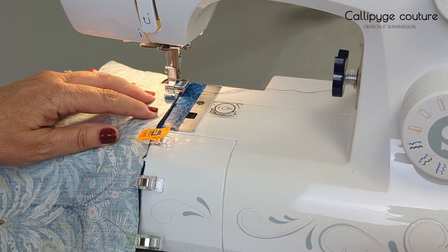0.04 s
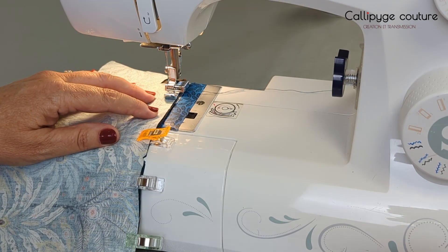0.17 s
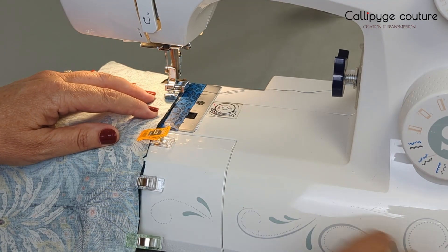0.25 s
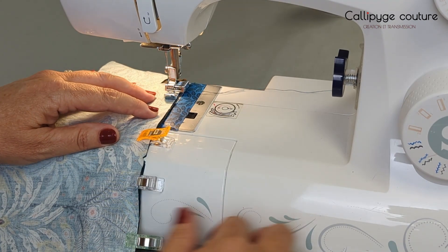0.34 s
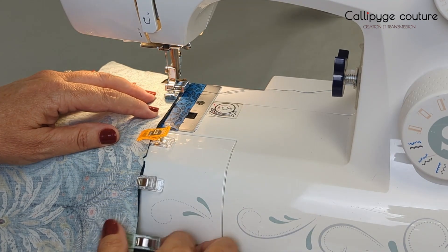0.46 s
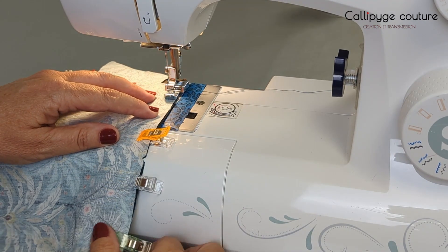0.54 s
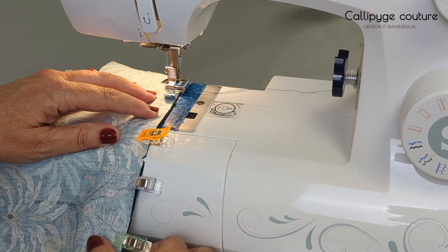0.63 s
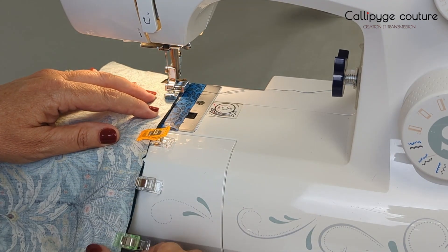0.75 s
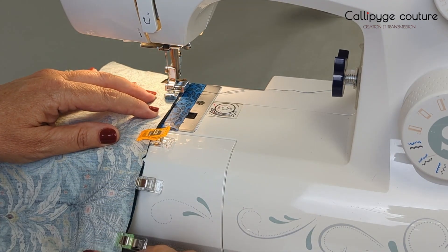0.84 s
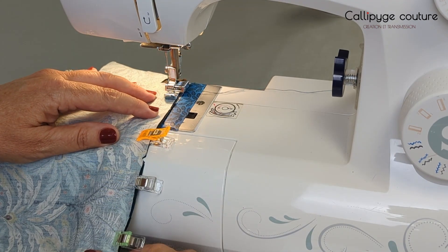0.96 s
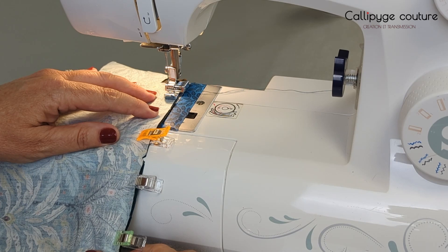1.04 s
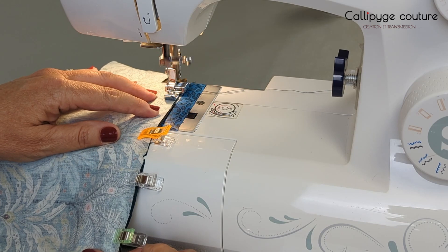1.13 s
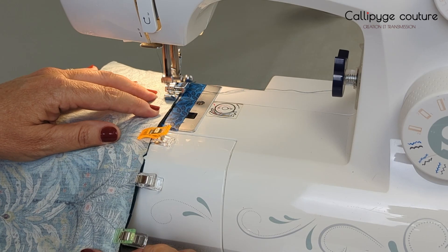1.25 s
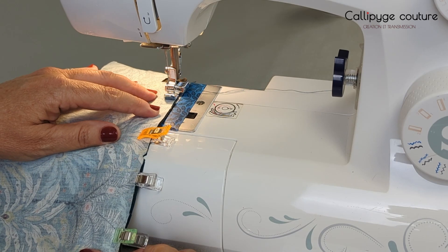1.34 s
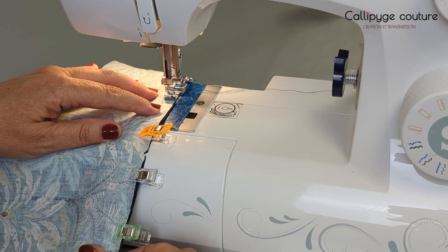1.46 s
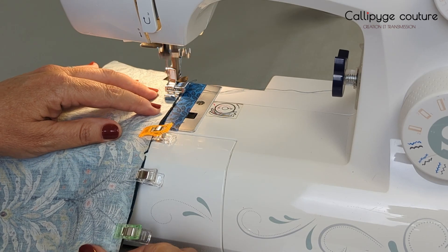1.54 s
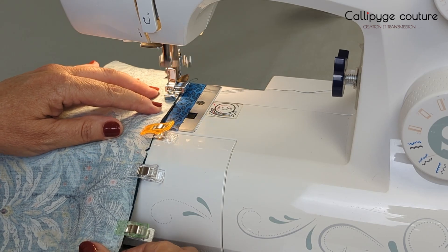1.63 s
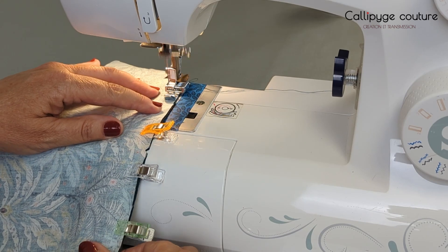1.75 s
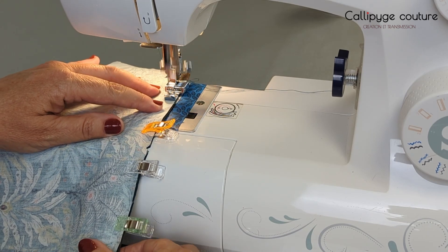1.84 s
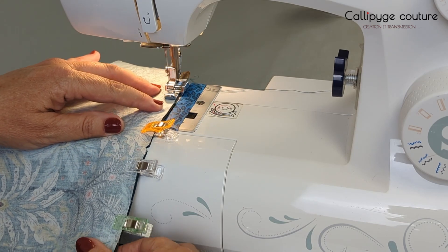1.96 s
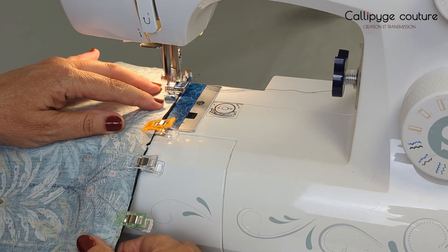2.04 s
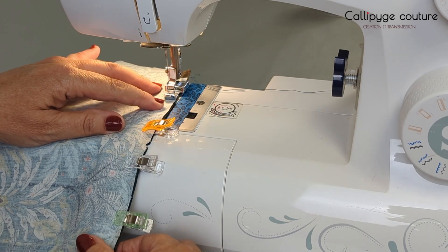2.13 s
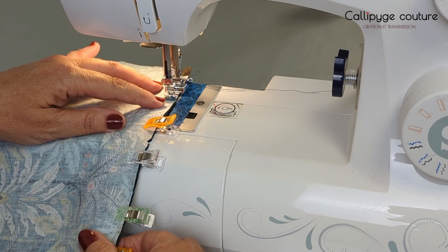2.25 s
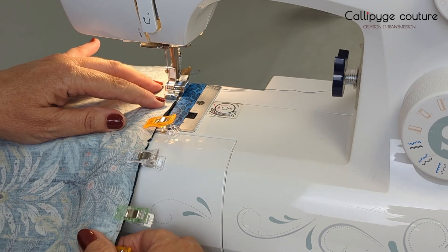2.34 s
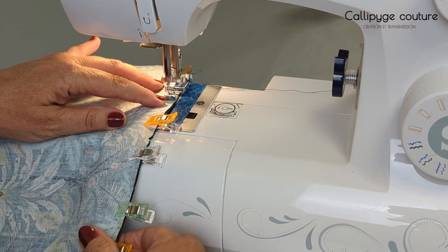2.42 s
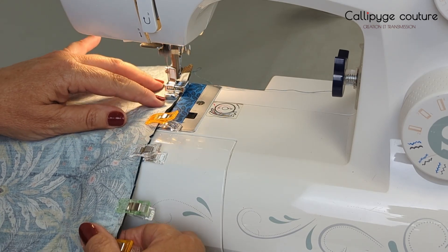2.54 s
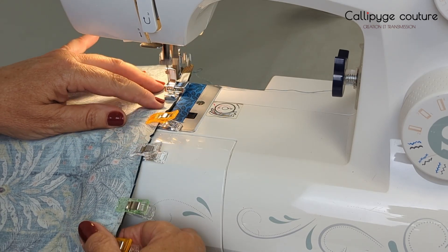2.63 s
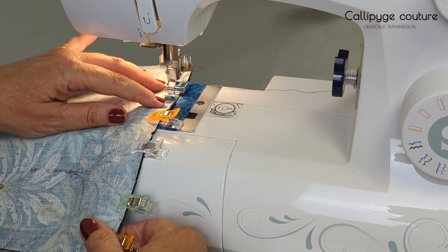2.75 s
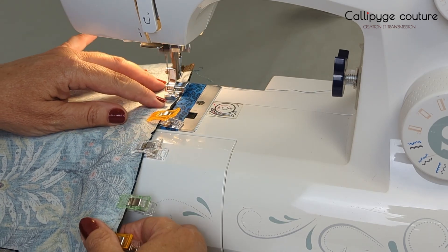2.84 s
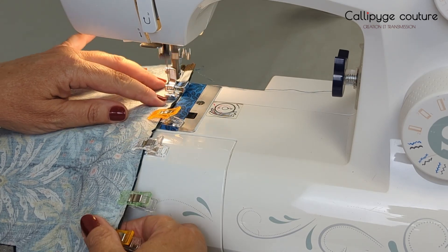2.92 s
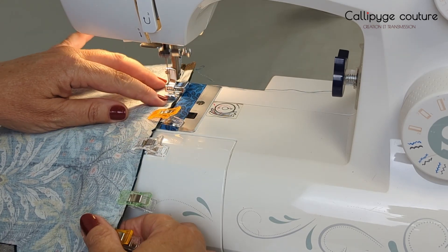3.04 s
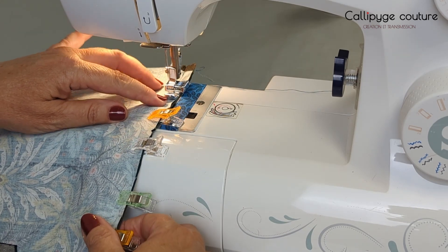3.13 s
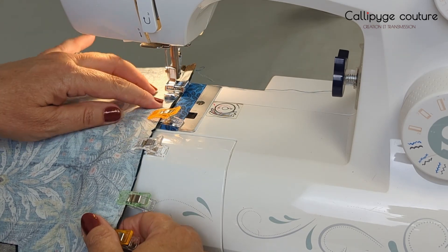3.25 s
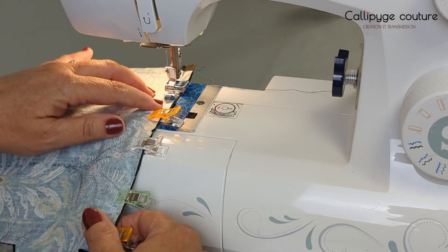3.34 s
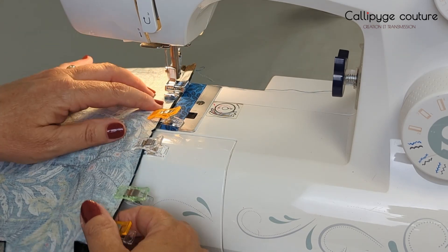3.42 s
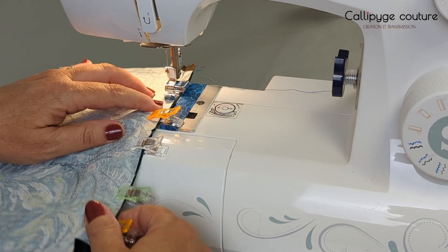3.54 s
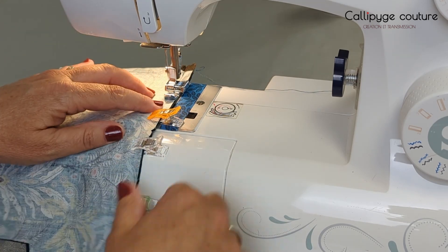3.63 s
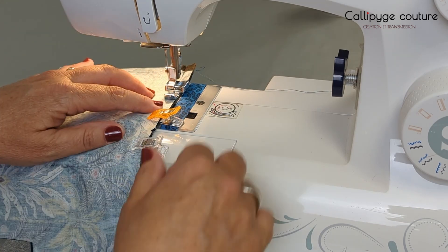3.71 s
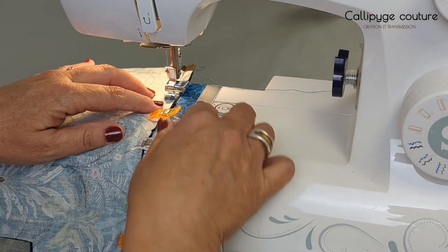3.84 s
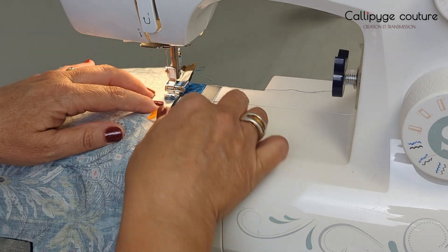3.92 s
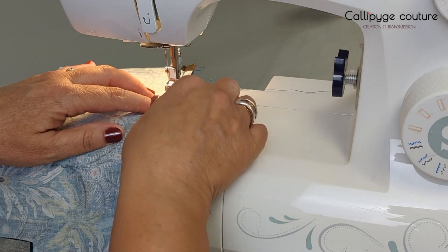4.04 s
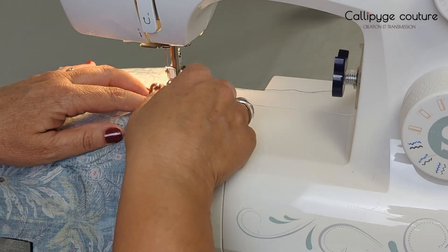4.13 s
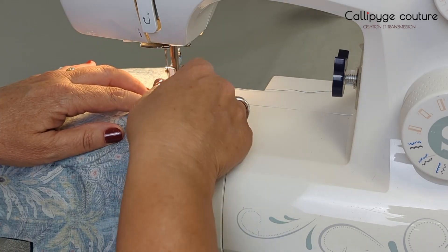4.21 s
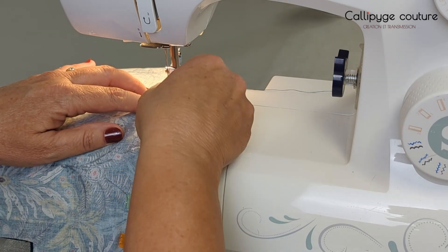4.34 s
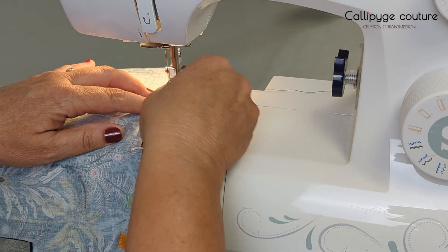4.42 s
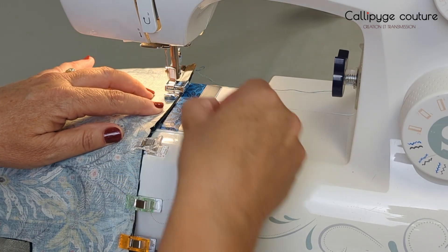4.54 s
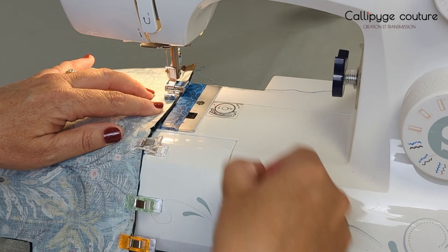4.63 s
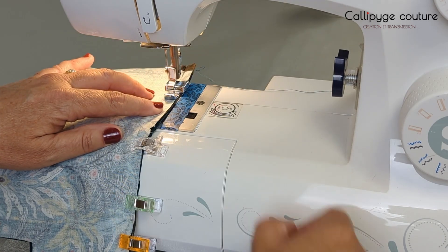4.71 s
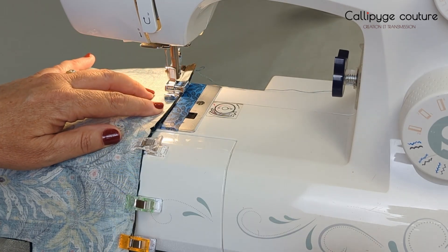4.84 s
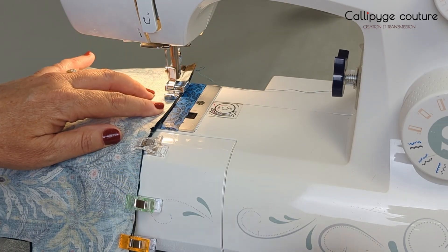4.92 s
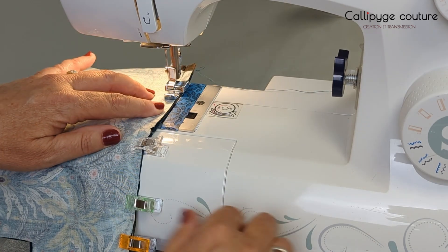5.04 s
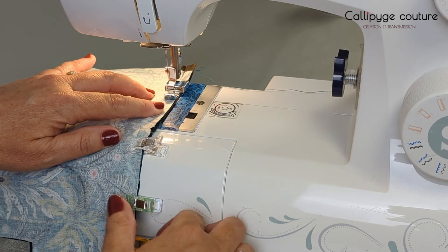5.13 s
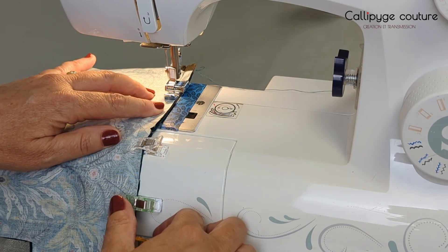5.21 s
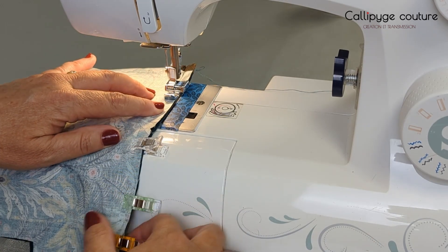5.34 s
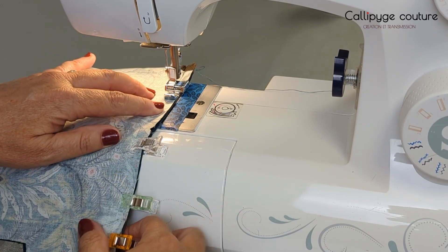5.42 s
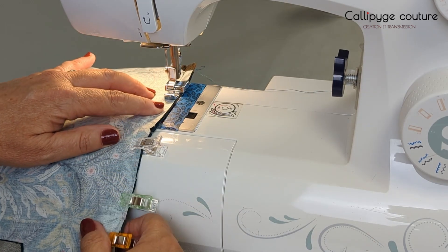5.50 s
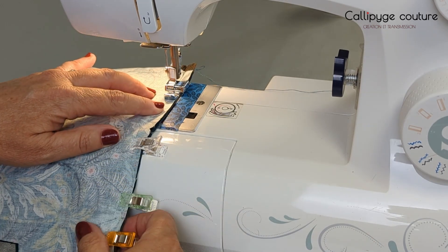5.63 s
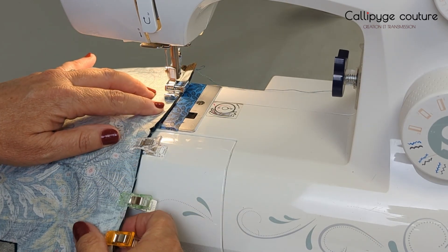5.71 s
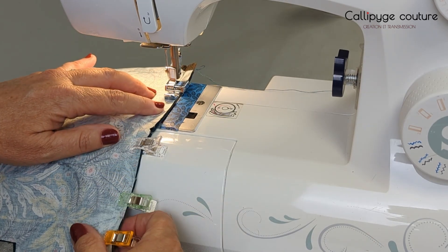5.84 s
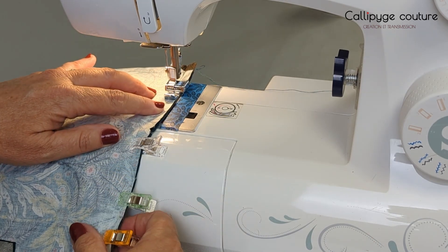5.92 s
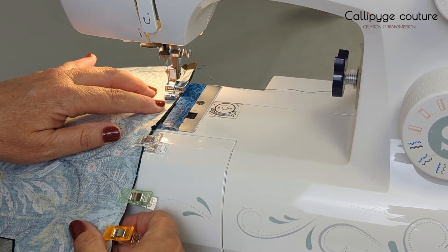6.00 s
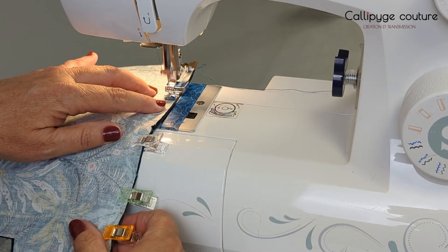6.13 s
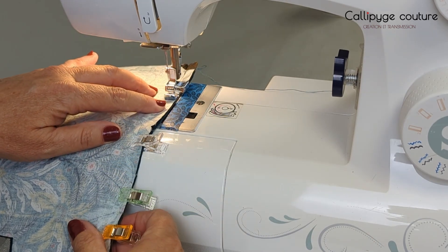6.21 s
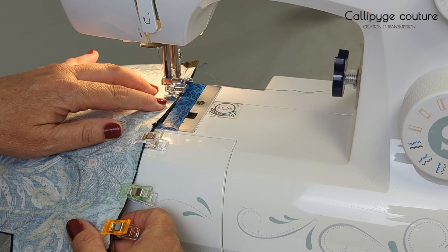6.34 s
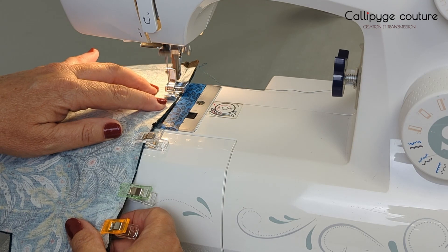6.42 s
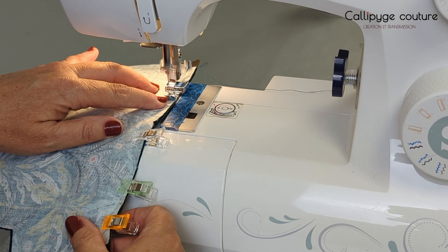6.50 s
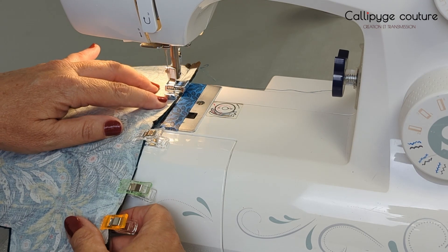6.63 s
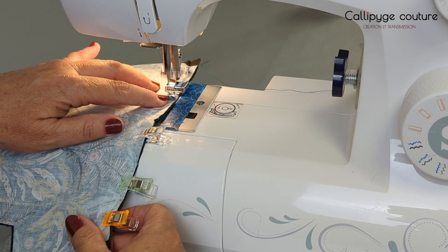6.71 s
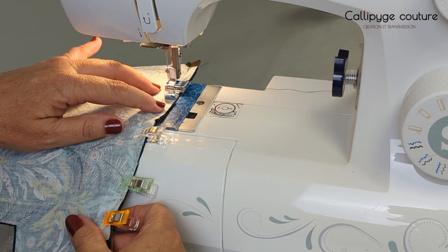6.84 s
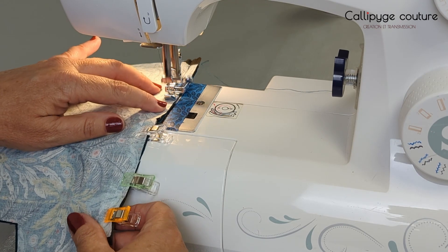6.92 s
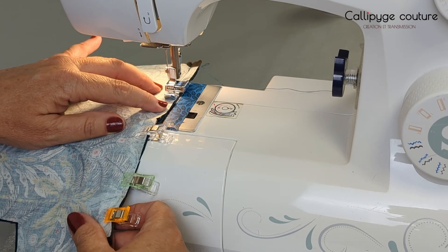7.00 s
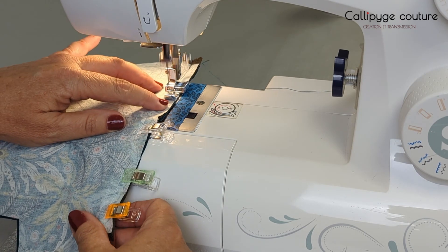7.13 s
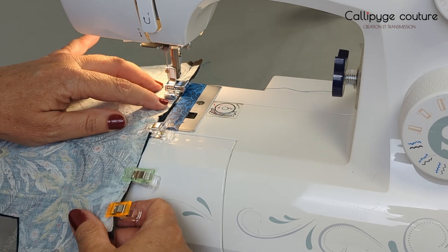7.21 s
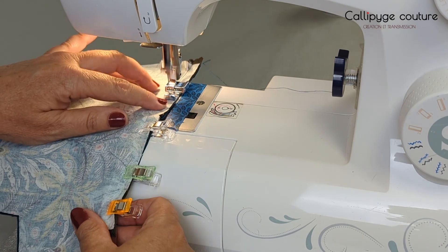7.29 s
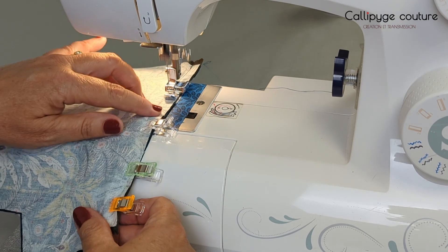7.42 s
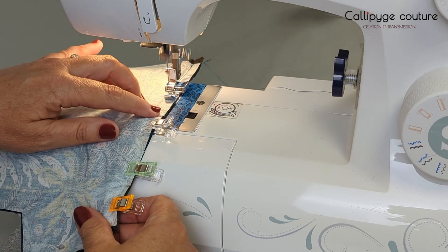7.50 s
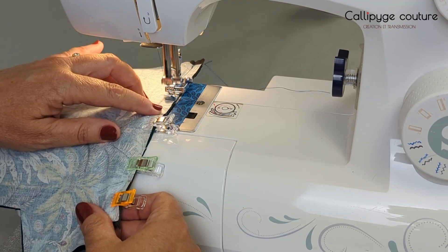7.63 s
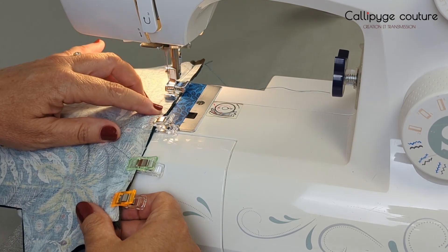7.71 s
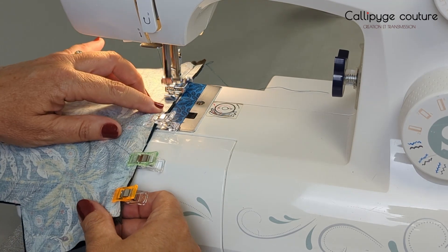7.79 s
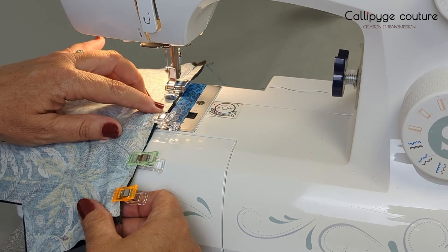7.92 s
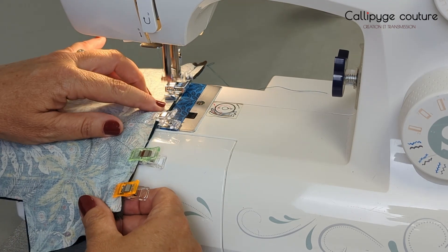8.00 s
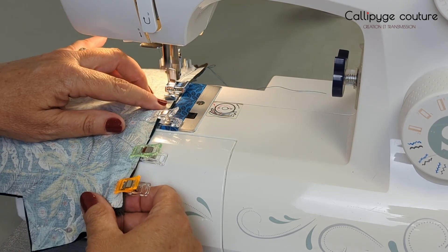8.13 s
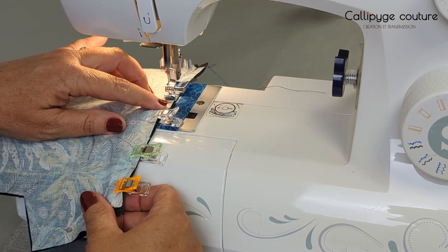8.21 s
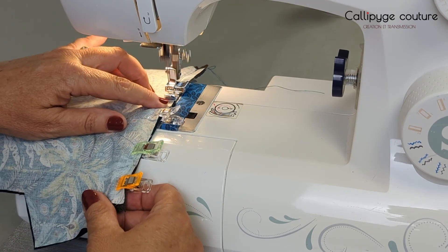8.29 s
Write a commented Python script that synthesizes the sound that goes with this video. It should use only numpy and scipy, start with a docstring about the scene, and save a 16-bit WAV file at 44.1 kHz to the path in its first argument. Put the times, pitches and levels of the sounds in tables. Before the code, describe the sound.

A close view of a sewing table in a small room with a low, quiet tone. At 0.2 seconds a plastic clip snaps brightly; around 0.4 to 0.7 fingers tap and cloth rustles softly, then a control clacks at 0.7 and again at 1.0. The sewing machine spins up with small ticks and runs until about 3.0, knocking between five and six times a second over gear clatter, rattle, hum and gliding whine, then brakes to rest by 3.3. At 3.7 a lever snaps in a tight ringing cluster. Faint cloth slides and taps follow around 4.0 to 4.7, clip clicks at 4.9 to 5.0, taps near 5.15. Hard hollow clacks with brief buzzes come at 5.5, 5.7 and 5.9. The second run starts at once, with low thuds near 6.3 and 7.5, and stitches steadily to the end, just past 8 seconds.

```python
"""A sewing machine stitches two short runs in a small room, close by; the second still runs at the end.
Each shaft turn repeats a tick, linkage knocks, a spring ping and the needle's blow, all shaped noise
bursts or short sines, over gear clatter (impacts in step with the shaft), gliding whine and motor hum.
Before and between the runs plastic clips and a lever snap, the controls clack and fingers tap, as noise
bursts through resonances; hands slide over the cloth as jerky filtered noise above a low room tone."""
import sys
import numpy as np
from scipy import signal
from scipy.fft import rfft, irfft
from scipy.io import wavfile
from scipy.ndimage import uniform_filter1d

SR = 44100
rng = np.random.default_rng(int(sys.argv[2]) if len(sys.argv) > 2 else 0)


def store_pcm(level_fs):
    """Save levels as 16-bit WAV."""
    pcm = np.round(np.clip(level_fs, -1, 1) * 32767).astype(np.int16)
    wavfile.write(sys.argv[1], SR, np.atleast_2d(pcm).T)


N = 368676
TIME = np.arange(N) / SR
STITCH_HZ = 5.593  # shaft turns a second at full speed

# motor hum partials: f/Hz, level/dB before the current's surge
HUM = [(100, -58.5), (300, -70.5), (500, -55), (700, -64)]
# pedal and shaft, one row a run: pedal down t/s, spin-up time constant/s, turns before first tick, pedal up t/s
RUNS = [(1.052, .289, .844, 2.96), (5.925, .268, .88, 8.5)]
# colour of the linkage and loose parts: f/Hz, relative level/dB
LINKS = [(40, -48), (200, 12), (350, 24), (900, 3), (1400, 10), (2500, 3), (3600, -1), (4800, -12),
         (7000, -16.5), (10000, -18.5), (14000, -44)]
# colour of the needle's blow: f/Hz, relative level/dB
NEEDLE = [(30, -28), (100, -7), (200, 4.5), (600, 12), (1100, 3), (2100, 8), (2850, 8), (3300, 2),
          (4500, -5.5), (7500, -12), (10500, -24), (15000, -33)]
# clacks of the controls: t/s, level/dB, bass tilt/dB, treble tilt/dB, thump level/dB (before the mix gains)
CLACKS = [(.701, -37.5, 3, -8, -46), (1.017, -44, -0.5, -12, -30.5), (5.5185, -30, 0.5, -10, -22),
          (5.6975, -35.5, -1, -15, -24), (5.915, -37.5, 7.5, -15, -23.5)]


def amp(db):
    """Decibels to gain."""
    return 10 ** (np.asarray(db) / 20)


def unit(x):
    """Scale to rms 1."""
    return x / np.sqrt(np.mean(x ** 2))


def at_hz(points, hz):
    """Read (Hz, value) points on a log-frequency axis."""
    f, value = np.transpose(points)
    return np.interp(np.log(hz + 1), np.log(f), value)


def convolve(x, response):
    """Pass a sound through a mono or stereo response."""
    return signal.fftconvolve(np.atleast_2d(x), np.atleast_2d(response), axes=-1)[:, :N]


def causal(gain):
    """The most compact (minimum-phase) causal response that has these gains."""
    cepstrum = irfft(np.log(gain))
    half = len(cepstrum) // 2
    cepstrum[1:half] *= 2
    cepstrum[half + 1:] = 0
    return irfft(np.exp(rfft(cepstrum)))


def body(points, bass_db=0, treble_db=0, size=2048):
    """Response of unit energy with the given spectrum, its ends tilted."""
    hz = np.fft.rfftfreq(size, 1 / SR)
    tilt_db = at_hz([(500, bass_db), (1700, 0.002), (7000, treble_db)], hz)
    response = causal(amp(at_hz(points, hz) + tilt_db))
    return response / np.linalg.norm(response)


def even(x, width_hz):
    """Even out a burst's spectrum over bands of this width, keeping its energy."""
    power = uniform_filter1d(np.abs(rfft(x)) ** 2, int(width_hz * len(x) / SR) + 1)
    y = signal.fftconvolve(x, causal((power + 1e-12) ** -.5))[:len(x)]
    return y * np.linalg.norm(x) / np.linalg.norm(y)


def resonance(x, hz, width_hz):
    """Two-pole band-pass with gain 1 at the centre."""
    return signal.lfilter(*signal.iirpeak(hz, hz / width_hz, SR), x)


def ringing(x, modes):
    """A sound together with the resonances that it excites."""
    return x + sum(amp(db) * resonance(x, hz, width_hz) for hz, width_hz, db in modes)


def walk(rate):
    """Slow chance with a spread near 1: random knots, this many a second, joined by lines."""
    knots = rng.standard_normal(int(N / SR * rate) + 2)
    return np.interp(TIME * rate, np.arange(len(knots)), knots)


def stereo_noise(size):
    """Noise whose left and right differ by an amount set for each frequency."""
    # stereo width: f/Hz, side minus mid level/dB
    side_db = [(60, -2), (150, -20.5), (330, -16.5), (700, -5), (1300, -3), (2500, 1), (15000, -1.5)]
    mid, side = rfft(rng.standard_normal((2, size)))
    width = amp(at_hz(side_db, np.fft.rfftfreq(size, 1 / SR)))
    return irfft((mid + np.outer([1, -1], side * width)) / np.sqrt(1 + width ** 2), size)


def room(early_db, late_db, early_s, size=24000):
    """Direct sound, quick reflections off the table and housing, then the room's tail."""
    # reverberation: f/Hz, time to fall 60 dB/s
    room_t60 = [(150, 0.38), (550, 0.4), (1500, 0.28), (2600, 0.39), (5000, 0.34), (10000, 0.29),
                (15000, 0.27)]
    t = np.arange(size) / SR
    hz, frame_s, z = signal.stft(stereo_noise(size), SR, nperseg=256)
    decay = amp(-60 * frame_s / at_hz(room_t60, hz)[:, None])
    late = signal.istft(z * decay)[1][:, :size]
    late = late * np.minimum(t / 0.0079, 1)
    early = stereo_noise(size) * np.exp(-t / early_s) * np.minimum(t / 0.0014, 1)
    response = (amp(early_db) * unit(early) + amp(late_db) * unit(late)) / np.sqrt(size)
    response[:, 0] += 1  # direct sound
    left, right = response
    return even((left + right) / 2, width_hz=142) + np.outer([1, -1], (left - right) / 2)


def contact(decay_s, scrape, size=3000):
    """A blow followed by dying chatter; it holds the energy of 10 ms at 0 dB."""
    chatter = rng.standard_normal(size) * np.exp(-np.arange(size) / SR / decay_s)
    push = scrape * chatter / np.linalg.norm(chatter)
    push[0] += 1
    push = even(push, width_hz=960)
    return push / np.linalg.norm(push) * np.sqrt(SR / 100)


def swell(rise_s, decay_s, size=2000):
    """A soft-edged noise burst: rises quickly to a peak and dies off; the energy of 10 ms at 0 dB."""
    t = np.arange(size) / SR
    envelope = np.exp(np.minimum((t - rise_s) / (0.55 * rise_s), (rise_s - t) / decay_s))
    push = even(rng.standard_normal(size) * envelope, width_hz=550)
    return push / np.linalg.norm(push) * np.sqrt(SR / 100)


def add(track, s, db, push, response):
    """Mix one blow into a track at time s."""
    sound = amp(db) * signal.fftconvolve(push, response)
    start = int(s * SR)
    part = track[start:start + len(sound)]
    part += sound[:len(part)]


def blows(rows, spectrum, push):
    """Blows of one kind, each with its own weight and brightness."""
    track = np.zeros(N)
    for s, db, bass_db, treble_db in rows:
        add(track, s, db, push(), body(spectrum, bass_db, treble_db))
    return track


def room_tone():
    """The room's low, steady noise, drifting slightly in level."""
    # colour of the air: f/Hz, relative level/dB
    air_colour = [(20, -36), (35, -24), (50, -14.5), (68, -2), (100, -3), (130, -5.5), (300, -13),
                  (500, -11), (750, -20.5), (1050, -36), (2000, -50), (3000, -58), (5000, -53),
                  (15000, -53)]
    drift_db = 1.3 * walk(6)
    return convolve(stereo_noise(N) * amp(drift_db - 60), body(air_colour, size=8192))


def cloth():
    """Cloth rustles in small jerks under sliding hands: noise with a restless level."""
    # hand slides: middle t/s, half length to 1/e/s, level/dB
    slide_rows = [(.56, 0.45, -62.5), (3.65, 0.29, -66), (4.023, 0.047, -57.5), (4.484, 0.085, -65.5),
                  (5.8, 0.54, -62.5)]
    # colour of the rustle: f/Hz, relative level/dB
    cloth_colour = [(30, -32), (200, 6), (600, 13), (1100, 1), (2200, 2.5), (4200, -10.5), (5500, -16),
                    (9500, -21), (15000, -41)]
    resting_hands_db, jerks_db = -70.5, 3 * walk(35)
    slides = sum(amp(db) * np.exp(-((TIME - s) / half_s) ** 2) for s, half_s, db in slide_rows)
    level = np.hypot(slides, amp(resting_hands_db)) * amp(jerks_db)
    return convolve(stereo_noise(N) * level, body(cloth_colour))


def current(down_s, up_s):
    """The motor's current starts softly, surges while the shaft gathers speed and dies on pedal up."""
    soft_start_s, surge_db, settle_s, cut_off_s = 0.19, 12.5, 0.8, 0.033
    on_s, off_s = np.maximum(TIME - down_s, 0), np.maximum(TIME - up_s, 0)
    surge = amp(surge_db * np.exp(-on_s / settle_s))
    return (1 - np.exp(-on_s / soft_start_s)) * surge * np.exp(-off_s / cut_off_s)


def motor():
    """Mains hum at twice the line frequency, each partial wavering in level and phase."""
    hum = np.zeros(N)
    for hz, db in HUM:
        level = amp(db + 3.4 * walk(18))
        hum += level * np.sin(2 * np.pi * hz * TIME + 0.74 * walk(8.9))
    return np.sqrt(2) * hum * sum(current(down_s, up_s) for down_s, _, _, up_s in RUNS)


def groans():
    """Short strains of the drive: mains pulses shake the frame, each time at its own pitch."""
    # strains: t/s, length/s, level/dB before the mix gain, f/Hz
    strains = [(0.716, 0.071, -45.5, 480), (1.128, 0.077, -46.5, 531), (3.742, 0.021, -42.5, 500),
               (5.173, 0.0425, -50.5, 420), (5.548, 0.034, -41, 525), (5.721, 0.031, -44, 545),
               (5.932, 0.035, -37.5, 600), (5.962, 0.023, -28.5, 535), (5.979, 0.046, -33, 525),
               (1.173, 0.044, -46, 520)]
    pulses = np.diff(np.floor(TIME * HUM[0][0]), prepend=0) * (1 + 1.5 * rng.standard_normal(N))
    waver, track = .5 * walk(40), np.zeros(N)
    for s, length, db, hz in strains:
        part = slice(int(s * SR), int((s + length + .01) * SR))
        t = TIME[part]
        gate = np.clip(np.minimum(t - s, s + length - t) / 0.006, 0, 1)
        frame = unit(resonance(resonance(pulses[part], hz, 170), hz, 188) + 1e-9)
        tone = 1.74 * np.sin(2 * np.pi * hz * t + waver[part])
        track[part] += amp(db) * gate * (frame + tone)
    return convolve(track, room(early_db=-2, late_db=-11, early_s=0.0037)) * amp(-4.0)


def buzzes():
    """Loose parts chatter in step with the mains pulses after hard clacks, fading as they settle."""
    # buzzes: t/s, length/s, level/dB before the mix gain
    buzz_rows = [(0.74, 0.093, -58), (5.529, 0.07, -47.5), (5.707, 0.063, -58), (5.918, 0.073, -43),
                 (1.052, 0.086, -57.5)]
    fade = np.zeros(N)
    for s, length, db in buzz_rows:
        fade += amp(db) * (TIME > s) * np.sqrt(np.clip(1 - (TIME - s) / length, 0, 1))
    pulsing = 1 + 0.48 * np.sin(2 * np.pi * HUM[0][0] * TIME)
    grit = rng.standard_normal(N) * pulsing * amp(3.9 * walk(250))
    return convolve(fade * grit, body(LINKS, bass_db=-7.5, treble_db=7.5))[0]


def taps():
    """Fingers tap: a blow and its dying chatter."""
    # taps: t/s, level/dB before the mix gain, bass tilt/dB, treble tilt/dB
    tap_rows = [(.421, -74, -18, -22), (.663, -70, -3, -2), (4.677, -66, -3, 1), (.481, -49, -7, 9),
                (.531, -50, -11, 4), (3.166, -47, -9, 14), (3.996, -57, -39, -3), (4.217, -56.5, -5.5, 7),
                (5.133, -47, -12.5, 8.5), (5.179, -43, -7, -9)]
    # colour of a tap: f/Hz, relative level/dB
    tap_colour = [(30, -35), (100, -12), (450, 23), (900, 3.5), (1700, -3), (3200, -10), (5000, -28.5),
                  (10000, -35.5), (15000, -60)]
    return blows(tap_rows, tap_colour, lambda: contact(decay_s=0.0051, scrape=4.9))


def starting_ticks():
    """Short bright ticks and knocks as the machine starts and makes its first turn."""
    # ticks and knocks: t/s, level/dB before the mix gain, bass tilt/dB, treble tilt/dB
    tick_rows = [(1.052, -56, -6, 19), (1.106, -53, -1, 12), (1.164, -64, -10, 8), (1.211, -67, -15, 15),
                 (1.26, -60, -15, 17), (1.403, -50, -17, 34), (1.455, -53, -7, 13), (5.941, -37.5, 7, -20),
                 (6.012, -44, 2, 3), (6.068, -69, -15, 20), (6.103, -45, 3, 9), (6.109, -51.5, 9, 1),
                 (6.277, -46, 5, 20)]
    return blows(tick_rows, LINKS, lambda: swell(rise_s=0.0046, decay_s=0.0032))


def thumps():
    """The hollow case's short tone under each clack, swelling and dying at one rate."""
    pitch_hz, peak_s, decay_s = 734, 0.006, 0.0031
    swells = np.zeros(N)
    for s, _, _, _, db in CLACKS:
        swells += amp(db) * np.exp(-np.minimum(np.abs(TIME - s - peak_s) / decay_s, 20))
    return swells * np.sin(2 * np.pi * pitch_hz * TIME)


def clacks():
    """The controls clack: short soft-edged noise bursts that ring."""
    # colour of a clack: f/Hz, relative level/dB
    clack_colour = [(25, -73), (90, 4.5), (300, -14.5), (520, -3), (800, 1.5), (1250, -9), (1750, -2.5),
                    (2400, 3), (3100, -4.5), (4200, -16), (5500, -17), (10300, -18.5), (12500, -32),
                    (15000, -35)]
    # ringing modes: f/Hz, width/Hz, level/dB
    clack_modes = [(509, 38, 8), (780, 59, -13), (1754, 20, -5), (2230, 25, 1), (2390, 21, -3),
                   (2502, 12, 10), (2659, 11, -1), (2821, 12, -3), (4180, 120, 5)]
    rows = [row[:4] for row in CLACKS]
    return ringing(blows(rows, clack_colour, lambda: swell(rise_s=0.00657, decay_s=0.0019)), clack_modes)


def lever():
    """A lever snaps in a quick cluster of impacts that ring."""
    # impacts: t/s, level/dB, bass tilt/dB, treble tilt/dB
    lever_rows = [(3.7275, -53, 7, 5.5), (3.7345, -32, 5, 3), (3.739, -40, 1, -6),
                  (3.743, -39.5, -1.5, -7.5), (3.7505, -39, -0.5, -7.5), (3.7595, -53, 4.5, -12),
                  (3.7675, -52, 8, -3), (3.772, -64, 5.5, -2)]
    # colour of the lever: f/Hz, relative level/dB
    lever_colour = [(40, -31), (300, -4), (500, 3), (720, -2), (1000, -7), (1550, 4.5), (2100, 5),
                    (3300, -0.5), (4400, -1), (6000, -5), (9300, -16.5), (10300, -8.5), (11500, -23),
                    (15000, -18)]
    # ringing modes: f/Hz, width/Hz, level/dB
    lever_modes = [(720, 73, 2), (1890, 70, -2), (2190, 120, 3), (2380, 270, -7), (4220, 200, 0),
                   (5000, 60, -8.5), (10200, 220, -0.5)]
    return ringing(blows(lever_rows, lever_colour, lambda: swell(rise_s=0.0026, decay_s=0.0023)), lever_modes)


def snaps():
    """Plastic sewing clips snap: very short bursts that ring."""
    # snaps: t/s, level/dB before the mix gain, bass tilt/dB, treble tilt/dB
    snap_rows = [(.1818, -44.5, -1, -6), (.1872, -50, -1, -1), (.202, -36.5, -1, -1), (4.8735, -57, 3, -9),
                 (4.8848, -40.5, -1, -11.5), (4.913, -55, 0, -18), (4.9718, -43, 6.5, -1)]
    # colour of a snap: f/Hz, relative level/dB
    snap_colour = [(30, -44), (130, -7.5), (450, -17), (750, -4), (1150, -1), (1500, 3), (1750, 7.5),
                   (2200, -4), (3200, -15), (5500, -21), (7200, -20), (8200, -33), (10300, -21),
                   (12500, -25), (15000, -35)]
    # ringing modes: f/Hz, width/Hz, level/dB
    snap_modes = [(1450, 69, -22), (1700, 190, -27), (7300, 150, 3), (8800, 510, 12), (9900, 170, 5)]
    return ringing(blows(snap_rows, snap_colour, lambda: swell(rise_s=0.00069, decay_s=0.0008)), snap_modes)


def small_sounds():
    """Snaps and thumps sound close; clacks, starting ticks, taps and buzzes sound from further off."""
    close = room(early_db=-7, late_db=-4, early_s=.008)
    further = room(early_db=3.5, late_db=0.0, early_s=0.0063)
    near_sounds = amp(6.0) * snaps() + lever() + thumps()
    far_sounds = clacks() + starting_ticks() + taps() + buzzes()
    return convolve(near_sounds, close) + amp(-1.5) * convolve(far_sounds, further)


def shaft_speed(down_s, spin_up_s, up_s):
    """Share of full speed: the shaft closes in on it while the pedal is down, then brakes evenly."""
    brake_s = .342  # from full speed to rest
    rise = 1 - np.exp(-np.maximum(TIME - down_s, 0) / spin_up_s)
    return rise * np.clip(1 - (TIME - up_s) / brake_s, 0, 1)


def teeth(turn, scatter_db, slip_s, count):
    """Small impacts whose uneven pattern comes round with each turn, never quite the same."""
    place = (np.arange(count) + rng.random(count)) / count
    size = rng.choice([-1, 1], count) * amp(scatter_db * rng.standard_normal(count))
    angle = np.arange(np.floor(turn[0]), turn[-1])[:, None] + place
    s = np.interp(angle, turn, TIME) + slip_s * rng.standard_normal(angle.shape)
    size = size * amp(1.62 * rng.standard_normal(angle.shape))
    reached = (angle > turn[0]) & (angle < turn[-1])
    pulses = np.bincount((s[reached] * SR).astype(int), size[reached], N)[:N]
    return pulses / np.sqrt(np.mean(size ** 2) * count * STITCH_HZ / SR)  # near rms 1 at full speed


def gear_clatter(turn, load):
    """Gear teeth rumble: impacts through the gears' colour, swelling with the needle's load."""
    # colour of the gears: f/Hz, relative level/dB
    gear_colour = [(25, -38), (45, -19), (68, -10.5), (100, -15), (120, -21), (142, -6), (190, -17),
                   (250, -9.5), (315, -4.5), (420, 0), (540, -1.5), (630, -14.5), (735, -3), (880, -21),
                   (1050, -20.5), (3000, -52.5)]
    gears = convolve(teeth(turn, scatter_db=4.0, slip_s=0.00023, count=64), body(gear_colour))[0]
    return gears * amp(2.2 * load + 2 * walk(22))


def part_rattle(turn, load):
    """Loose parts rattle: denser impacts and some steady noise, swelling with the load."""
    # colour of the rattle: f/Hz, relative level/dB
    rattle_colour = [(60, -21), (300, -14), (900, -9), (1350, 5.5), (1700, -6), (2400, 1.5), (3200, -4.5),
                     (4100, -10), (4800, -14.5), (7000, -9), (8300, -15), (10200, -14.5), (12000, -26),
                     (15000, -39)]
    grit = teeth(turn, scatter_db=7.0, slip_s=.0003, count=140) + .5 * rng.standard_normal(N)
    return convolve(grit, body(rattle_colour))[0] * amp(3.8 * load + 2 * walk(45))


def whine(turn, speed, load):
    """Motor, belt and gear tones follow the shaft, gliding within each turn and fading under load."""
    # pitch glide: share of the turn, share of the mean speed
    sag = [(.33, .974), (.67, 1.024), (.9, 1.012)]
    # tone frequencies: cycles per shaft turn
    whine_orders = [25, 125.2, 250.4, 436, 509, 643, 745]
    # tone levels: level/dB before effort, speed and the mix gain
    whine_db = [-60.5, -57, -60, -66.5, -66.5, -65, -73]
    share, pace = np.transpose(sag)
    turn_hz = STITCH_HZ * speed * (np.interp(turn, share, pace, period=1) + 0.0022 * walk(40))
    angle = 2 * np.pi * np.cumsum(turn_hz) / SR
    tones = np.zeros(N)
    for order, db in zip(whine_orders, whine_db):
        tones += amp(db + 3.3 * walk(25) - 2.6 * load) * np.sin(order * angle)
    return speed * tones


def passes(turn, share):
    """The samples at which the shaft passes this share of a turn."""
    return np.searchsorted(turn, np.arange(np.ceil(turn[0] - share), turn[-1] - share) + share)


def clatter(bass_db, treble_db):
    """What one knock rings with: its colour and the loose parts that it catches change every time."""
    # loose parts: lowest f/Hz, highest f/Hz, width/Hz, level/dB
    loose_parts = [(290, 488, 28, 1), (1080, 2130, 38, 8.5), (2170, 3900, 65, 4), (3260, 3600, 63, 11)]
    colour_db = 2  # spread of the bass and treble tilts
    tilt = np.array([bass_db, treble_db]) + colour_db * rng.standard_normal(2)
    caught = [(low + (high - low) * rng.random(), width, db) for low, high, width, db in loose_parts]
    return amp(-2.5) * ringing(body(LINKS, *tilt), caught)


def spring_ping(decay_s, size=3000):
    """The thread's check spring flicks and rings briefly, mostly sliding upward, each time differently."""
    # ringing modes: f/Hz, level/dB
    spring_modes = [(3890, -2), (3980, -4), (5750, -9)]
    t = np.arange(size) / SR
    slide = (0.65 + 0.5 * rng.standard_normal()) * t
    ring = np.zeros(size)
    for hz, db in spring_modes:
        detuned_hz = hz * (1 + 0.019 * rng.standard_normal())
        ring += amp(db) * np.sin(2 * np.pi * detuned_hz * t * (1 + slide))
    return ring * np.exp(-t / decay_s) * np.minimum(t / 0.0042, 1)


def knocks(turn, speed, effort):
    """Each turn brings a tick, linkage knocks, spring ping and needle blow, scaled by speed or effort."""
    # colour of the tick: f/Hz, relative level/dB
    tick_colour = [(500, 2), (2500, 2.5), (5000, -8.5), (7000, 6.5), (8200, -3.5), (9600, 1), (12000, -21),
                   (15000, -15)]
    # take-up lever, hook and feed: share of the turn, level/dB, decay/s, bass tilt/dB, treble tilt/dB
    linkage = [(.09, -37, 0.0074, -0.5, -2.5), (.17, -47, 0.0052, 2.5, -6), (.32, -51, 0.01, 0, -8),
               (.46, -42, 0.006, 2, -8), (.54, -50, .005, -5, -9), (0.721, -46, 0.011, 2.5, 3)]
    # how hard the cloth resists the needle: t/s, level/dB
    resistance_rows = [(1.5, -4), (1.7, 6), (2.2, -2), (6.6, -2), (7.3, 3), (7.7, 6)]
    tick_at, spring_at, needle_at = -.015, .205, .385  # share of the turn
    tick_db, spring_db, needle_db = -47, -40.5, -42.5  # before speed or effort and the mix gain
    resistance_db = np.interp(TIME, *np.transpose(resistance_rows))
    track = np.zeros(N)
    for i in passes(turn, tick_at):
        add(track, TIME[i], tick_db, effort[i] * swell(rise_s=0.0033, decay_s=0.0017), body(tick_colour))
    for share, db, decay_s, bass_db, treble_db in linkage:
        for i in passes(turn, share):
            push = effort[i] * swell(rise_s=0.0017, decay_s=decay_s)
            add(track, TIME[i], db, push, clatter(bass_db, treble_db))
    for i in passes(turn, spring_at):
        add(track, TIME[i], spring_db, [speed[i]], spring_ping(decay_s=0.0069))
    for i in passes(turn, needle_at):
        push = speed[i] * contact(decay_s=0.008, scrape=1.2)
        add(track, TIME[i], needle_db + resistance_db[i], push, body(NEEDLE))
    return track


def stitching(down_s, spin_up_s, lead_turns, up_s):
    """One run: gears rumble and whine, loose parts rattle and the linkage knocks, timed by the shaft."""
    speed_power, rumble_power = 0.94, 0.026  # loudness against speed; the rumble's further power
    strain_db, strain_s = 3.5, 0.54  # extra level at pedal down and its fading time
    gears_db, rattle_db = -39.5, -52.5  # before effort and the mix gain
    load_at = 0.29  # share of the turn with the heaviest load
    speed = shaft_speed(down_s, spin_up_s, up_s)
    turn = np.cumsum(speed) * STITCH_HZ / SR - lead_turns
    strain = amp(strain_db * np.exp(-np.maximum(TIME - down_s, 0) / strain_s))
    effort = speed ** speed_power * strain
    load = np.cos(2 * np.pi * (turn - load_at))
    gears = amp(gears_db) * speed ** rumble_power * gear_clatter(turn, load)
    rattle = amp(rattle_db) * part_rattle(turn, load)
    parts = effort * np.array([gears, rattle, whine(turn, speed, load)])
    return np.vstack([parts, knocks(turn, speed, effort)])


def frame_thuds():
    """The needle hits thick spots in the seam and the frame thuds."""
    # thick spots: t/s, level/dB before the mix gain, bass tilt/dB, treble tilt/dB
    thick_spots = [(6.317, -34.5, 10.5, 3), (6.362, -37, 5, -10), (7.486, -29, -4.5, 4)]
    # frame mode: f/Hz, width/Hz, level/dB
    frame_modes = [(134.4, 41, 22.5)]
    return ringing(blows(thick_spots, NEEDLE, lambda: swell(rise_s=0.0044, decay_s=0.0079)), frame_modes)


def machine():
    """Each part rings the housing and reaches the listener by its own path."""
    # housing resonances: f/Hz, width/Hz, level/dB
    housing = [(147.8, 2.4, -1.5), (420, 49, -25.5), (687, 63, -0.5), (958, 48, 2), (1350, 270, -5.5),
               (1924, 59, -0.5), (2590, 130, -14), (2820, 72, -11), (3330, 160, -8), (3990, 26, -25),
               (7700, 52, 2)]
    mix = np.zeros((2, N))
    for part in [*sum(stitching(*run) for run in RUNS), frame_thuds()]:
        path = ringing(room(early_db=10.5, late_db=-1.5, early_s=0.0055), housing)
        mix += convolve(part, path)
    return amp(-11.0) * mix


def scene():
    """Everything at the sewing table."""
    return room_tone() + cloth() + motor() + groans() + small_sounds() + machine()


def record(dry):
    """A steep low-pass cuts the top above 15.3 kHz."""
    return signal.sosfilt(signal.ellip(8, .2, 70, 15300, fs=SR, output="sos"), dry)


dry = scene()
out = record(dry)
store_pcm(out)
```